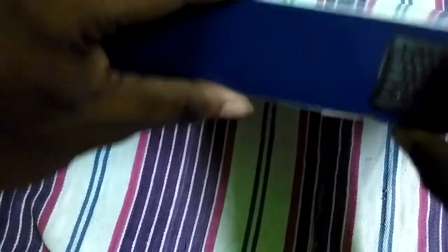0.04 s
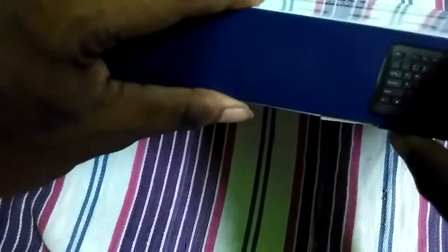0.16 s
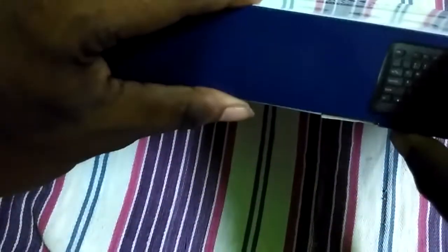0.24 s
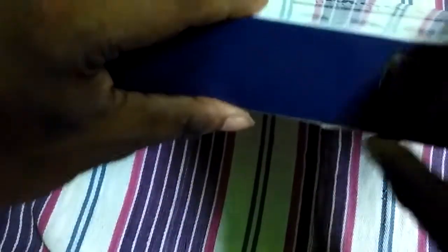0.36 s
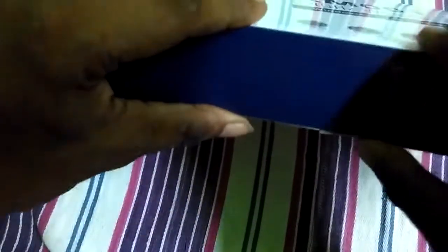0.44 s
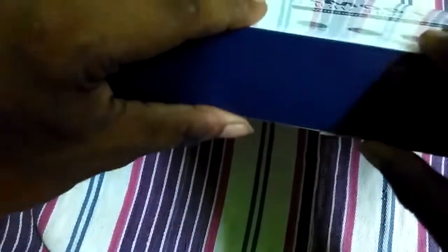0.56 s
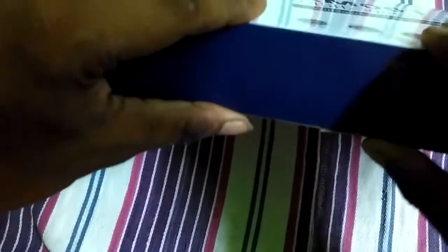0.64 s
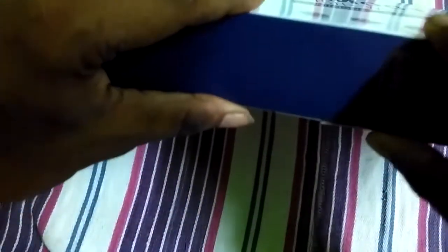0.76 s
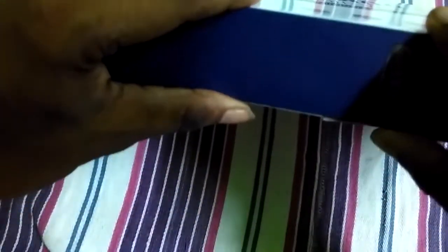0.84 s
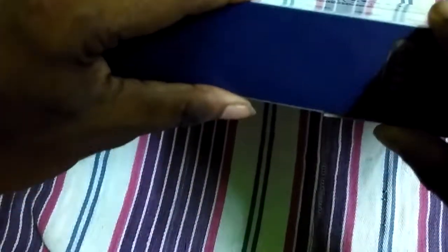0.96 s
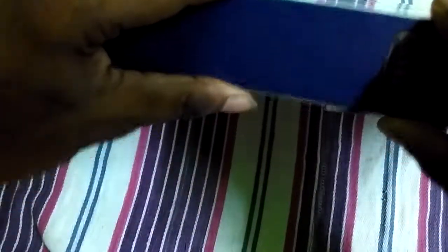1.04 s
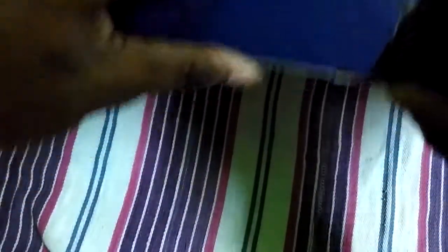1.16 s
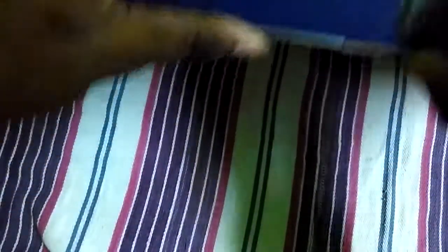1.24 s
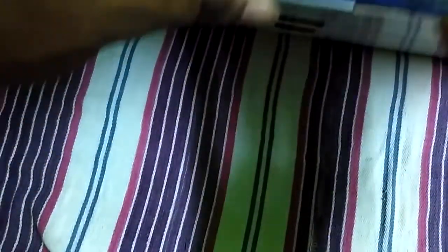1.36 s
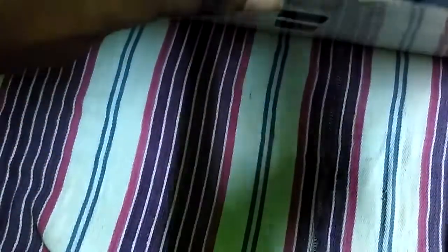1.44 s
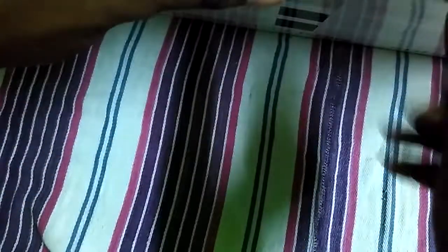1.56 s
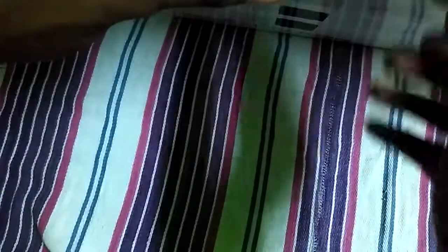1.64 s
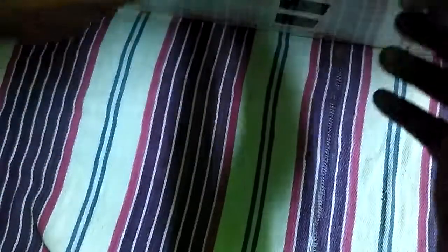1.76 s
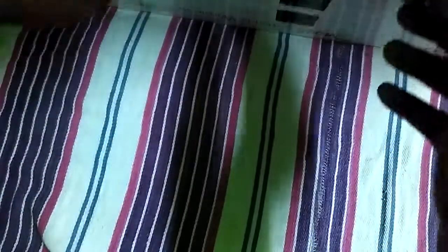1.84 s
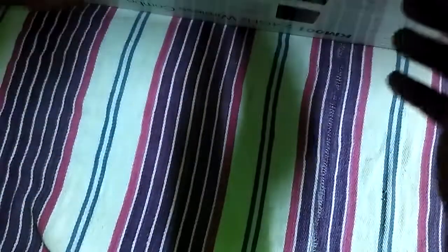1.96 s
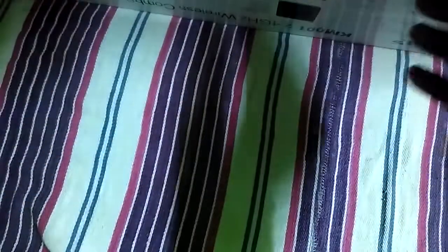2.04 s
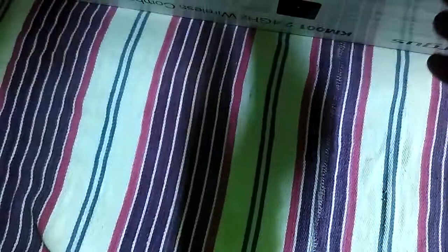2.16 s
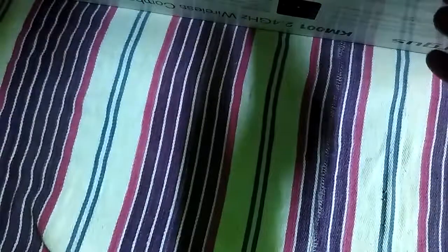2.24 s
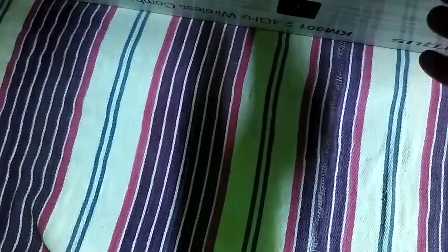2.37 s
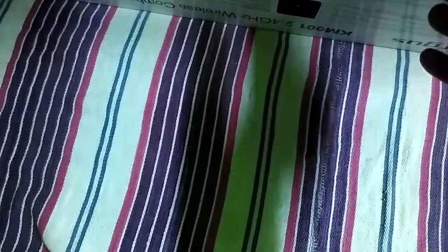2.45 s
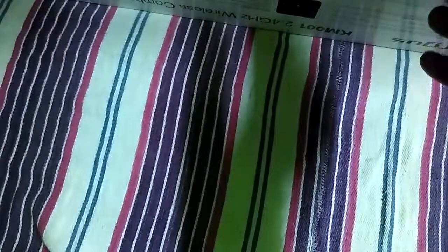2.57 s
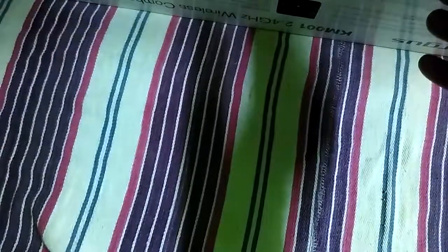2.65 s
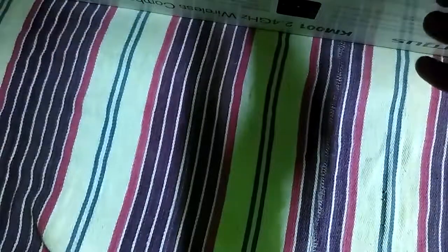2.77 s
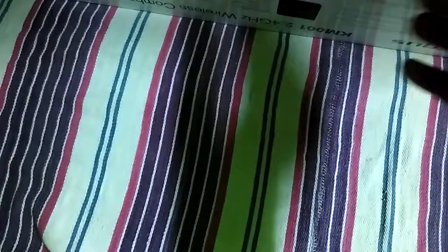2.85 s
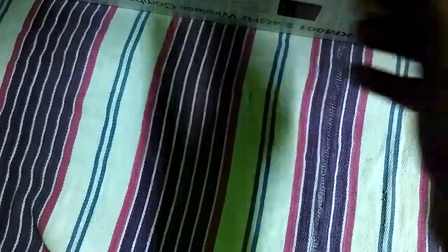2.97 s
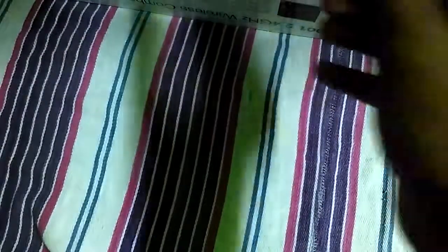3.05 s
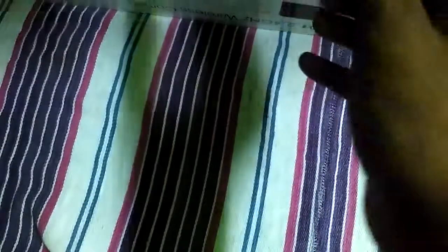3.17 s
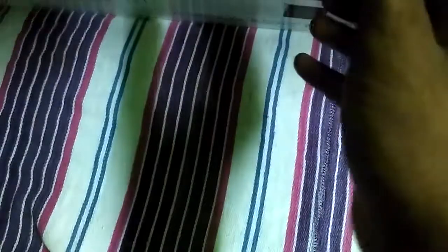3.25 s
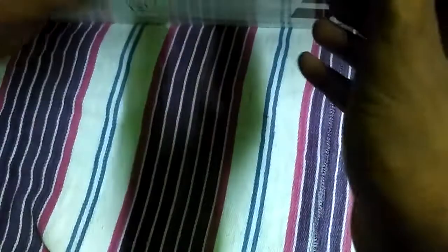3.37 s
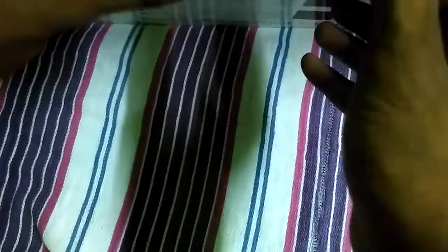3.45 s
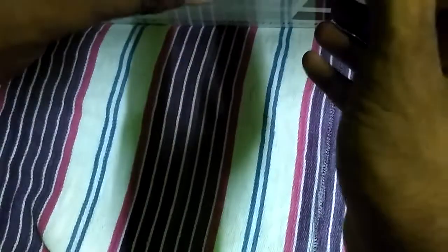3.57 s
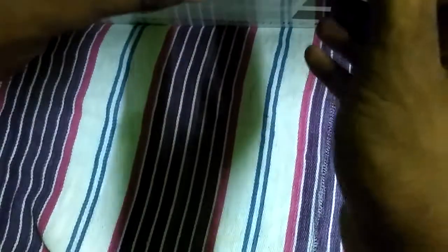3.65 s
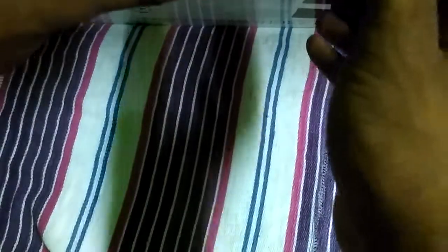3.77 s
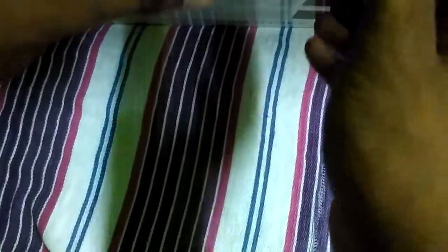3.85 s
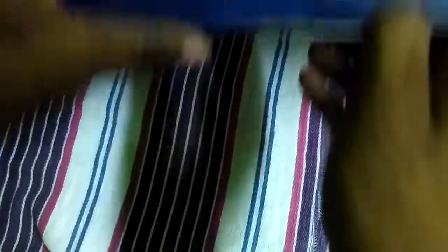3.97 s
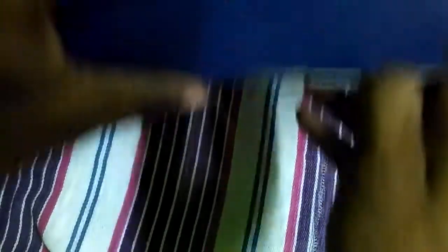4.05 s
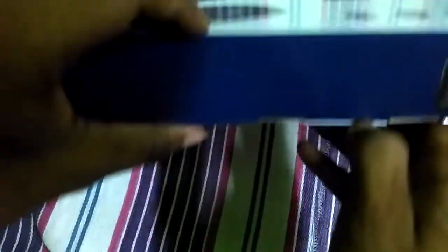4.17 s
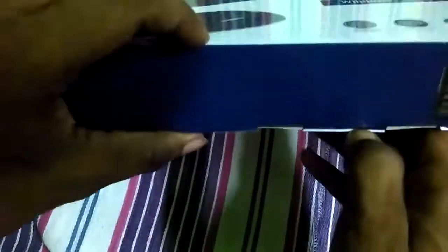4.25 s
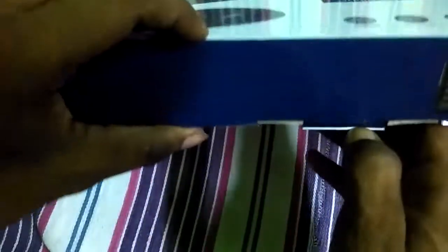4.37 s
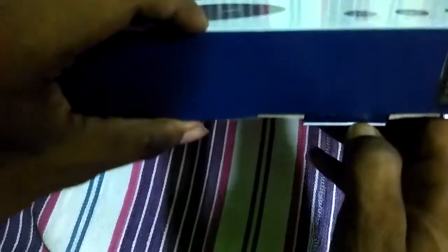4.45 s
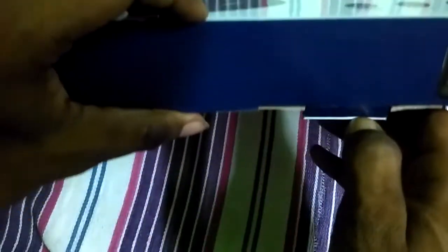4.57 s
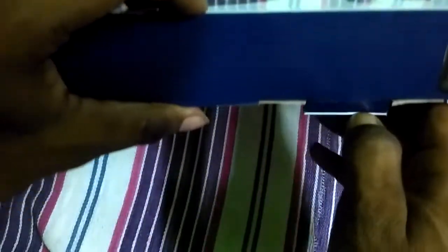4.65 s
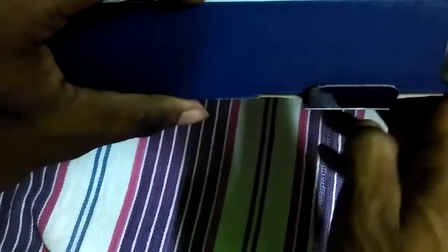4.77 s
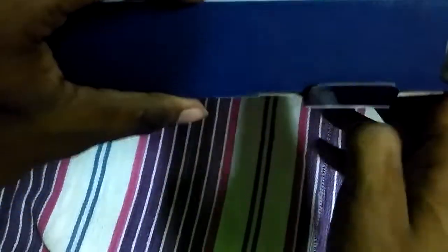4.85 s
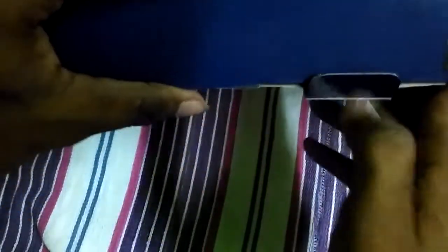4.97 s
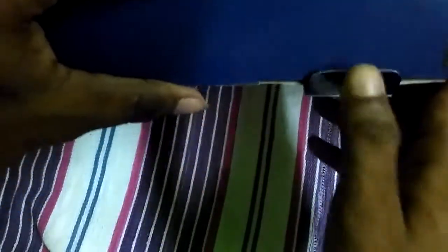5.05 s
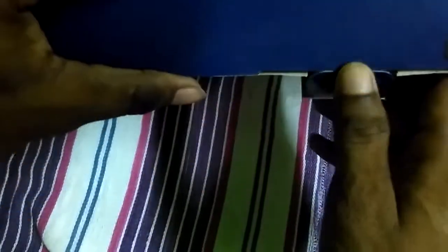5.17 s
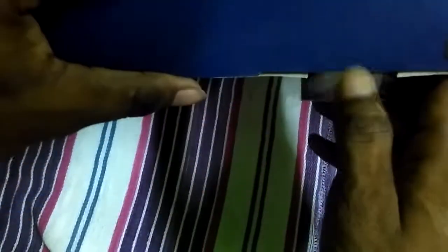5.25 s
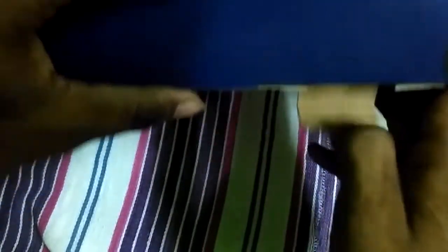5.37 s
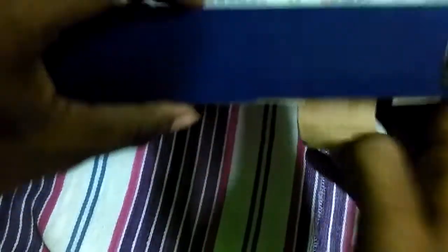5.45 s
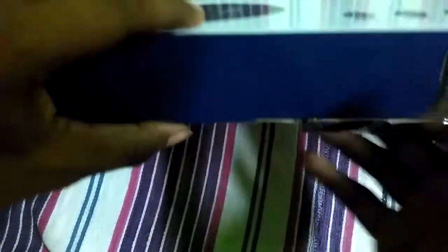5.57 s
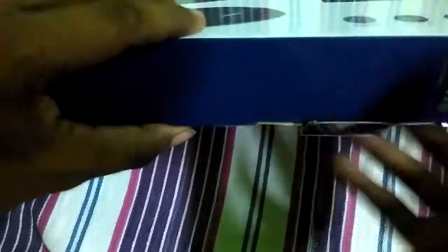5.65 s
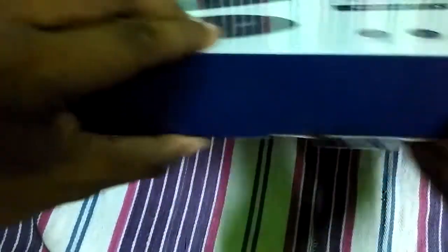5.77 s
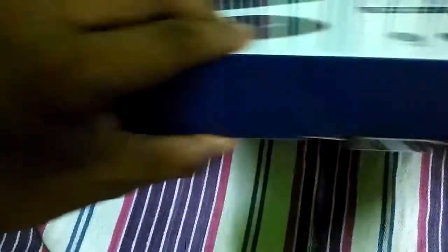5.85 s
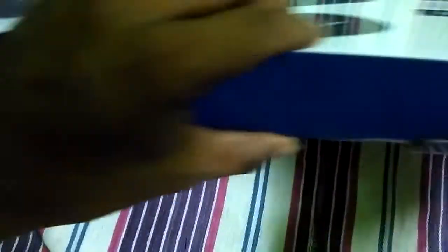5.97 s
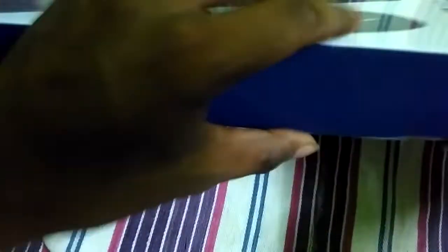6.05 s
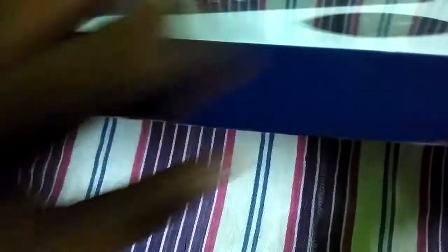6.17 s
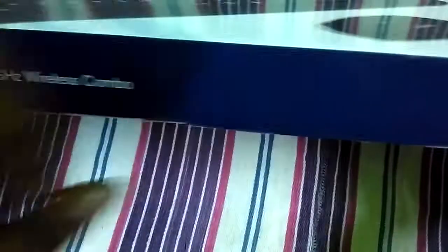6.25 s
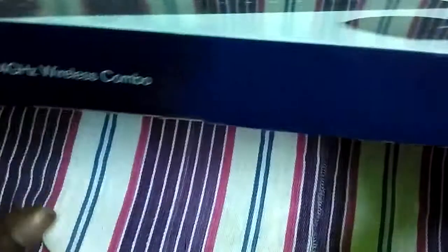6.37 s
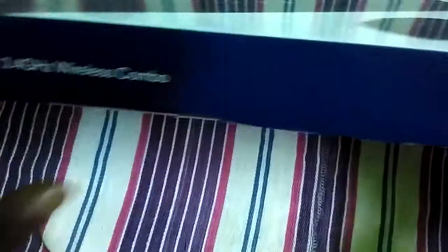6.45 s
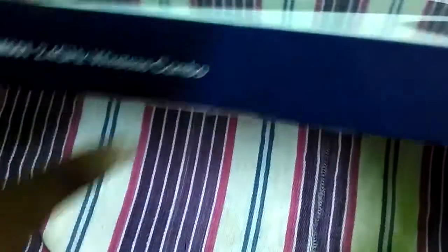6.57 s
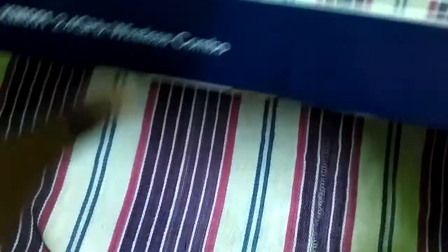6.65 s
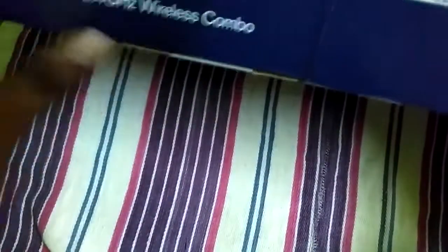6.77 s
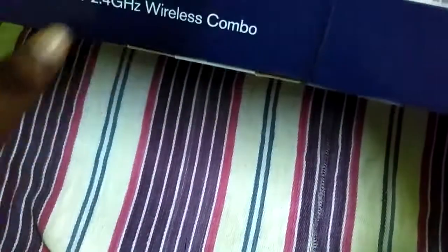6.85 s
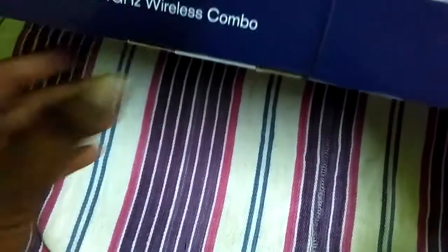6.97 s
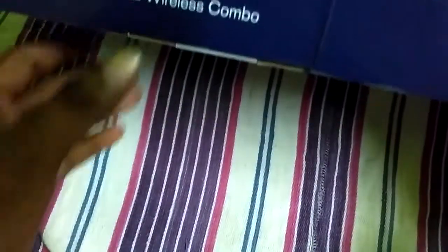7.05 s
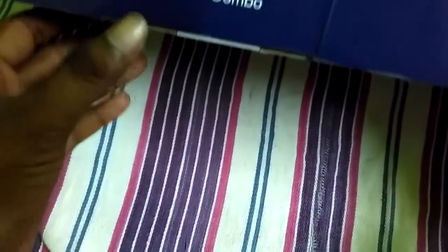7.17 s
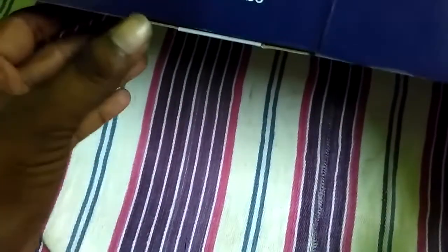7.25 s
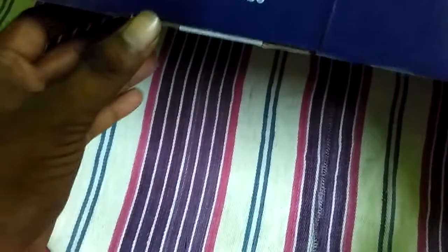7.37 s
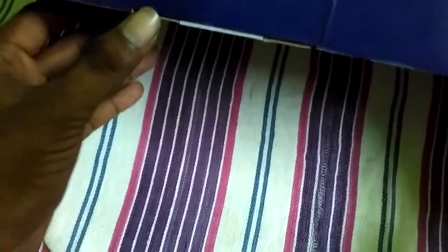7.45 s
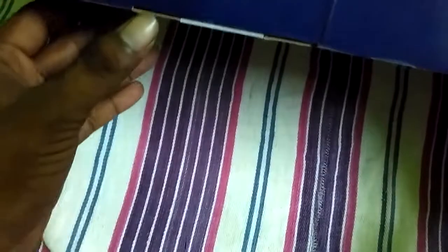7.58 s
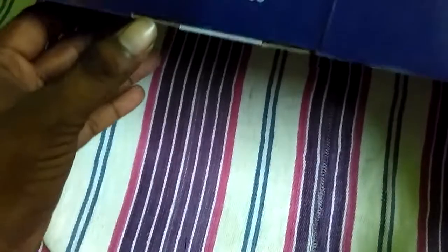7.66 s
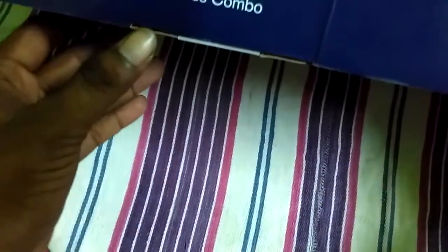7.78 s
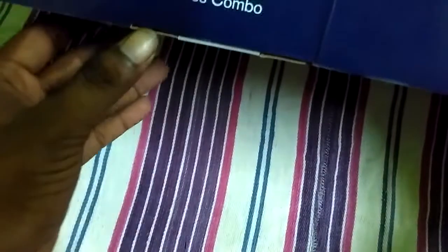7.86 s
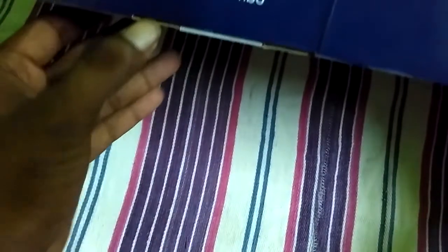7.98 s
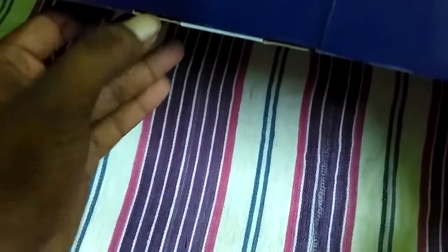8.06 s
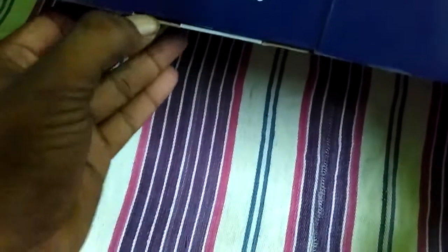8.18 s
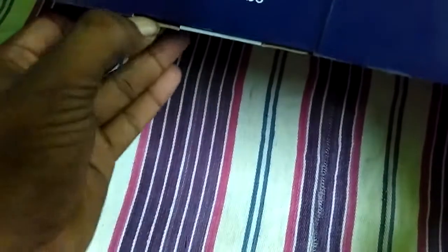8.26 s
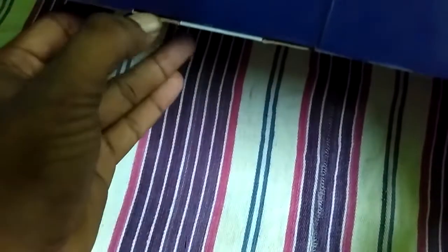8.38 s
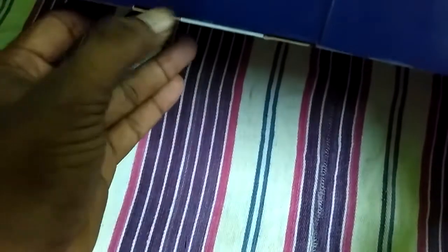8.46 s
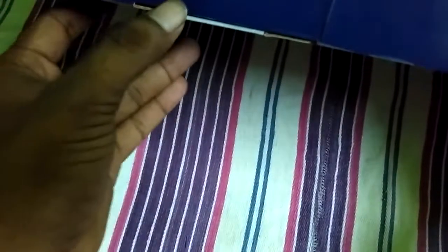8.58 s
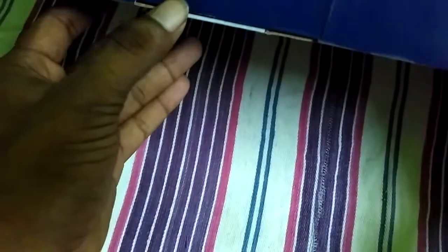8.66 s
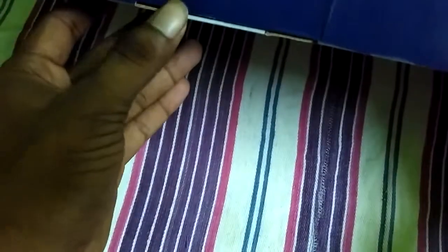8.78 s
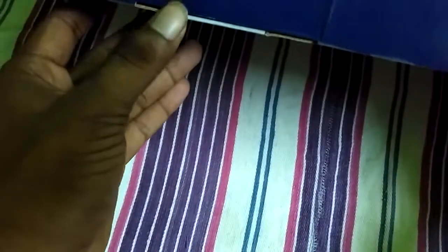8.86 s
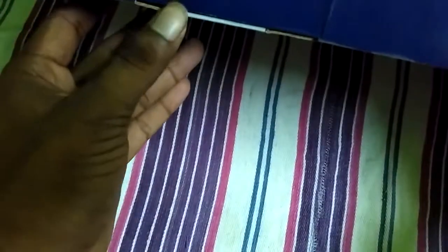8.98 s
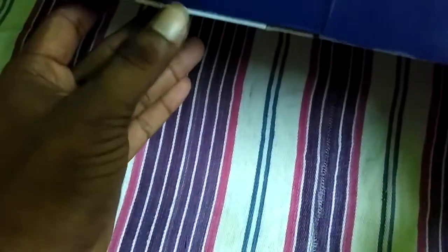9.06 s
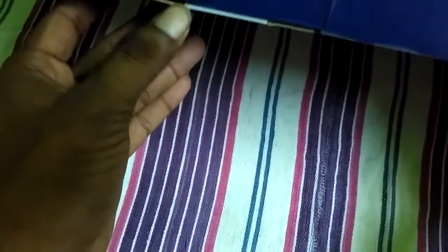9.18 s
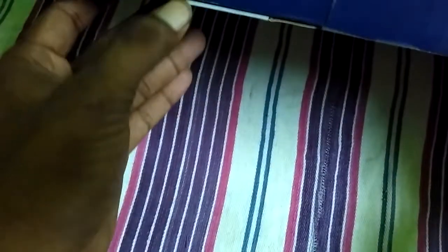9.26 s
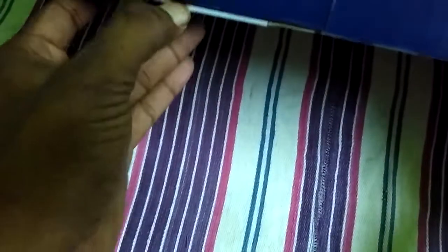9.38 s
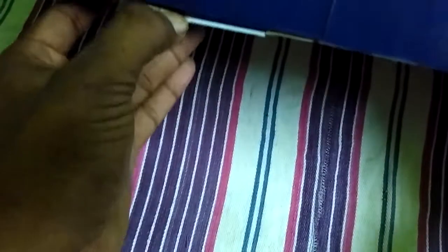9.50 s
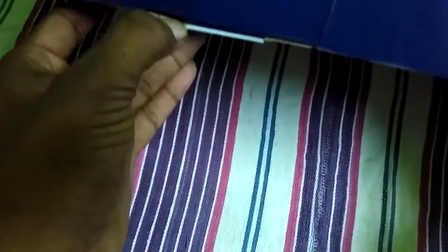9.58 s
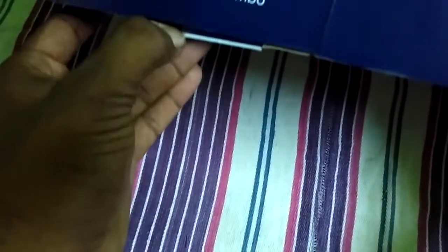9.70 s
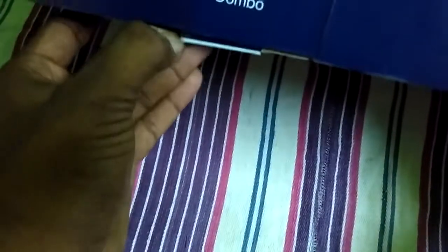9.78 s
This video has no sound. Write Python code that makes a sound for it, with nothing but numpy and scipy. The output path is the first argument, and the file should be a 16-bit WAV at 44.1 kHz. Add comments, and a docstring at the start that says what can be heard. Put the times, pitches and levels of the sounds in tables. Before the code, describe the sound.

Close stereo microphones catch hands working on a hollow cardboard box on a soft bed in a small room. Sparse taps, nail ticks and dry rubs come first, then quick picking at a flap builds to a sharp rip and loud snap midway. Tight card then rubs, creaks and judders, followed by scattered knocks and one heavy knock near the end. A very faint low fan hum runs underneath.

```python
"""A long cardboard box is handled on a cloth-covered bed in a small room, close to the microphones.
A fan hums throughout. At first skin rubs the card, fingers tap it, nails tick and edges scrape briefly.
After 4.4 s a tuck flap is picked at; near 4.85 s it rips out of its slot and snaps free.
From 6 s tight card creaks and judders where it sticks; more taps and rubs follow, one loud near 9.2 s.
Bursts of noise make the rubs and cracks, fading sine waves the knocks, and sine waves the hums."""
import sys
import numpy as np
from scipy import signal
from scipy.fft import rfft, irfft, next_fast_len
from scipy.io import wavfile
from scipy.ndimage import uniform_filter1d

SR = 44100
rng = np.random.default_rng(int(sys.argv[2]) if len(sys.argv) > 2 else 0)


def store_pcm(level_fs):
    """Save levels as 16-bit WAV."""
    pcm = np.round(np.clip(level_fs, -1, 1) * 32767).astype(np.int16)
    wavfile.write(sys.argv[1], SR, np.atleast_2d(pcm).T)


N = 433503
TIME = np.arange(N) / SR   # seconds

# Event levels are set before the box's echoes and the microphones are added.
# skin and card sliding over the box, at full strength from start to end:
# (start t/s, end t/s, hiss level/dB, panel level/dB)
STROKES = [(0.0, 0.09, -70.5, -73.5), (0.414, 0.48, -63.5, -72), (1.263, 1.41, -66, -76),
           (1.8, 2.17, -72, -77), (2.42, 2.633, -66.5, -81.5), (3.288, 3.463, -62, -69),
           (4.01, 4.078, -63.5, -70.5), (5.68, 5.903, -65.5, -68.5), (5.937, 6.06, -57, -66.5),
           (6.053, 6.184, -55, -61.5), (6.25, 6.405, -62.5, -63), (6.566, 6.872, -62, -67.5),
           (8.084, 8.551, -76, -83.5), (9.458, 9.611, -75, -74.5)]
# taps and snaps of the card:
# (t/s, panel pitch f/Hz, hollow thud level/dB, knock level/dB, crack level/dB, tick level/dB)
TAPS = [(0.092, 1080, -70, -56.5, -65, -74), (0.1757, 1810, -71, -37, -37.5, -42.5),
        (0.4057, 800, -57, -50.5, -61.5, -49), (0.5346, 595, -61, -51.5, -70, -70),
        (1.2844, 620, -45.5, -48, -43.5, -39), (1.305, 1120, -54, -51.5, -80, -60),
        (1.496, 745, -47.5, -53, -54, -62), (1.506, 1020.0, -51, -58, -57, -41.5),
        (1.883, 1740, -58, -58, -65, -65), (1.9079, 886, -45, -40.5, -41, -54.5),
        (2.0153, 690.0, -71, -57.5, -80, -54), (2.077, 820, -53, -58.5, -82, -86),
        (2.29, 1120, -55.5, -60, -75, -77), (2.489, 720, -66, -59, -66, -59),
        (2.915, 670, -78, -56, -59, -64), (3.305, 640, -50.5, -58, -63, -72),
        (3.5121, 930, -65, -52.5, -81, -84), (3.7885, 895, -57, -59, -49, -52),
        (3.806, 1100.0, -70, -56, -52, -52), (3.8247, 1010, -55, -53, -53, -49),
        (3.84, 1160, -70, -52, -49.5, -44), (3.9565, 1720.0, -60.5, -61, -57.5, -49.5),
        (4.023, 686, -49, -47, -69, -50), (4.413, 660, -64.0, -58.5, -68, -49.5),
        (4.433, 1900, -52, -56, -58, -48), (4.456, 980, -45, -50, -50, -39.5),
        (4.5374, 637, -49.5, -43, -53.0, -43), (4.591, 720, -43.5, -43, -46.5, -44),
        (4.6738, 746, -42.5, -39, -41.5, -38), (4.693, 700, -50, -38, -41, -37),
        (4.779, 700.0, -44, -40, -48, -33), (4.7985, 1070, -41, -35.5, -44, -31),
        (4.8061, 1300, -54, -42, -43, -36), (4.8337, 905, -33, -30, -49, -37),
        (4.8593, 1013, -40, -21.5, -29.5, -29.5), (5.2703, 1110, -43.5, -36.5, -42, -45),
        (5.384, 1020, -40, -38, -68, -44.5), (5.5666, 686, -50, -53, -53, -50.5),
        (5.597, 646, -56, -55.5, -57, -42), (5.7586, 780, -50, -46.5, -45.5, -37),
        (6.121, 740.0, -48, -51, -54.5, -49), (6.3561, 660.0, -41.5, -47, -53, -51),
        (6.406, 1240, -77, -47.5, -61.5, -73), (6.5243, 680, -44.5, -32, -42.5, -39),
        (6.642, 1280, -73.0, -43, -58, -73), (6.7993, 1060.0, -44.5, -42, -44.5, -56),
        (6.9347, 1507, -65.5, -56, -80.5, -78.5), (7.185, 830, -46, -57, -56, -54.5),
        (7.629, 1100, -58, -60, -62, -63), (7.641, 1013, -53.5, -46, -48, -50.5),
        (8.482, 1970, -64, -56.5, -75.5, -67), (8.6297, 700.0, -51, -46, -55.5, -55.5),
        (8.891, 1025, -77.0, -57.5, -62.5, -56), (9.1762, 660, -34, -38, -42.5, -41.5),
        (9.1907, 840, -30, -22.5, -31, -38), (9.5588, 758, -55.5, -53, -70, -77)]
# card edges dragged over card: (start t/s, end t/s, hiss level/dB, swell over the stroke/dB,
# rasp f/Hz, rasp level/dB, panel level/dB)
SCRAPES = [(0.194, 0.234, -55.5, 2, 1780, -62, -61), (1.483, 1.503, -55.5, 25, 780, -68.5, -64),
           (2.374, 2.416, -63, 7, 1960, -72, -64.5), (4.466, 4.52, -48.5, -2, 4940, -62, -54),
           (4.78, 4.791, -43, -10, 5500, -47, -42.5), (4.812, 4.83, -31, 14, 3480, -44.5, -48),
           (4.829, 4.839, -22, -4, 5460, -29.5, -35), (4.837, 4.854, -44.5, -15, 2803, -48, -46.5),
           (5.186, 5.236, -50, 5.5, 1085, -58.5, -59), (5.238, 5.277, -40.5, 3, 5000, -56, -50),
           (5.373, 5.391, -61, 13, 1380, -54, -54), (5.547, 5.619, -56.5, -5, 1220, -86, -63.5),
           (6.124, 6.215, -52.5, 8.5, 1330, -62, -56.5), (6.669, 6.699, -68, -1, 1300, -60, -61),
           (6.756, 6.779, -57.5, 5, 1730, -59, -57.5), (6.82, 6.902, -56.5, 11, 1300, -67.5, -66.5),
           (7.179, 7.221, -57.5, -1, 1270, -67, -64.5), (9.169, 9.197, -57, 5, 2470, -55, -47.5)]
# fingernails flick over an edge without moving the panel: (t/s, level/dB)
NAIL_TICKS = [(0.315, -49), (1.785, -62), (3.718, -47), (8.0747, -61), (8.507, -56.5), (8.9155, -47.5),
              (9.4324, -56.5)]
# jolts of the whole box on the bed: (t/s, level/dB)
THUMPS = [(1.284, -57), (1.908, -54), (4.833, -39), (4.86, -48.5), (9.19, -35.5)]
# tight card groans as it starts to give: (start t/s, end t/s, slips per s, level/dB)
CREAKS = [(6.022, 6.033, 680, -60.5), (6.172, 6.199, 716, -45.5), (6.759, 6.779, 875, -55)]
# stick-slip runs: (start t/s, length t/s, slips per s, level/dB)
JUDDERS = [(6.2195, .0145, 315, -31), (6.2498, .009, 155, -32), (6.3572, .004, 340, -32),
           (6.3652, .005, 300, -37)]

# ringing tones, with the time each takes to fall by 60 dB: (f/Hz, level/dB, fall t/s)
PANEL_MODES = [(566, -4.5, 0.017), (684, -4, 0.03), (877, -4.5, 0.019), (963, -3, 0.026), (1136, 1, 0.021),
               (1402, -0.5, 0.019), (1680, -6, 0.022), (1893, -3.5, 0.036), (2637, -4.5, 0.018)]   # card panels
HOLLOW_MODES = [(269.5, -3, 0.028), (447, 4, 0.022)]   # air and walls of the hollow box
BOX_MODES = [(62, -11.5, .2), (109, -4, .28), (159, -5.5, 0.48)]   # the whole box
# resonances of the flap: (f/Hz, width f/Hz, level/dB)
FLAP = [(462, 20, 8.5), (931, 130, 5.5), (3480, 300, 6.5)]

# tone colours, as points on a frequency curve: (f/Hz, level/dB)
CRACK = [(900, -19.5), (1700, -6.5), (2400, 0), (3400, -4), (4400, -4.5), (5700, -3.5), (6800, -2.5),
         (9000, -29.5)]   # cracking card
FIBRES = [(2000, -20.5), (4500, -8.5), (6500, -6), (8000, -3), (10500, 2.5), (13000, -7), (15000, -13)]   # fine card fibres
PANEL_CRACKLE = [(300, 0), (1300, -4), (7000, -18.5)]   # crackling panels
RUBBED_PANEL = [(90, -3), (200, -11), (400, 0.5), (640, 1), (1000, -5), (1500, -8.5), (3000, -11.5),
                (6000, -26)]   # panels set moving by rubbing
ROOM_NOISE = [(25, -25), (58, 0), (100, -1.5), (170, -0.5), (210, -7), (270, -12), (430, -13.5),
              (700, -24.5), (1300, -32.5), (14000, -35)]   # rumble of moving air
HISS = [(250, 4.5), (600, 3.5), (1300, -7), (3000, -9), (6000, -12.5), (10000, -6.5), (14000, -10)]   # room hiss with the suppressor open

# echoes of the room: (f/Hz, level/dB, time to fall by 60 dB t/s)
ROOM = [(150, -0.5, 0.026), (510, -7, 0.26), (1110, -14, 0.22), (2980, -8, 0.15), (7000, -19, 0.17),
        (13000, -11.5, 0.17)]
# how alike left and right are: (f/Hz, likeness from 0 to 1)
LIKENESS = [(100, 0.81), (500, 0.76), (1300, 0.27), (3000, 0.23), (6000, 0.35), (10000, 0.038)]
# resonances of the microphone ports: (f/Hz, width f/Hz, left level/dB, right level/dB)
PORTS = [(950, 2600, 4.5, 1), (3173, 4300, -2, 1.5), (9600, 4100, 6, -5), (13600, 650, 3, -6.5)]

CUTOFF_HZ = 14200
FAN_HZ, MAINS_HZ = 127.5, 100   # blade hum and motor hum
CLOSING_DB_PER_S = 59.5   # how fast the noise suppressor closes
STROKE_ATTACK_S, STROKE_RELEASE_S = 0.059, 0.066   # the hand gathers speed, and comes to rest
BRUSH_BELOW_DB, BRUSH_S = 18, 0.0042   # a finger brushes the card just before it lands
GRIP_DETUNE = 0.032   # typical share by which the hands shift the panel tones from blow to blow
FLEX_CYCLES = 6.2   # the struck spot falls by 60 dB in this many cycles
PANEL_RING_DB = -5   # the panel rings on under it
CONTACT_LAG_S = .00009   # a contact reaches one microphone before the other
RASP_Q = 4.2   # how narrowly each of two filters makes the dragged edge sing
CATCH_DB, CATCHES_PER_S = 1, 550   # the pull comes in uneven jerks
NAIL_CRACK_DB = -7   # the edge's crack against the nail's tick
BOOM_DB, BOOM_T60_S, BOOM_BAND_HZ = -6.5, .24, (140, 290)   # crowded low tones of the jolted walls
CREAK_WAVER, CREAK_SWELL_DB = 0.038, 13   # wavering share of the slip rate; growth until the card lets go
SLIP_LAG_S = 0.0002   # the slips reach the right microphone later


def from_db(db):
    """Turn decibels into a multiplier."""
    return 10 ** (np.asarray(db) / 20)


def rms_one(x):
    """Scale to an average strength (rms) of 1."""
    return x / np.sqrt(np.mean(x ** 2) + 1e-20)


def at_level(hit, db, size=265):
    """Scale a sound so that its first samples (usually 6 ms) have this rms level."""
    return hit * from_db(db) / np.sqrt(np.mean(hit[:, :size] ** 2))


def at_hz(points, hz, axis=1):
    """Read a table column between its points, with frequency on a log scale."""
    points = np.array(points)
    return np.interp(np.log(hz + 1e-9), np.log(points[:, 0]), points[:, axis])


def add(track, s, sound):
    """Mix a sound into a track at a time in seconds."""
    i = max(round(s * SR), 0)
    track[..., i:i + sound.shape[-1]] += sound[..., :max(N - i, 0)]


def drift(rate):
    """A random wander of rms 1: straight lines between 'rate' random points a second."""
    knots = rng.standard_normal(int(N / SR * rate) + 2)
    return rms_one(np.interp(TIME * rate, np.arange(len(knots)), knots))


def coloured(pair, spectrum):
    """Two unrelated signals become one stereo sound of rms 1, alike in the bass and apart in the treble."""
    length = pair.shape[1]
    size = next_fast_len(length, True)
    hz = np.arange(size // 2 + 1) * SR / size
    mid, side = rfft(pair, size) * from_db(at_hz(spectrum, hz))
    alike = np.clip(at_hz(LIKENESS, hz), 0, 1)
    stereo = np.sqrt(1 + alike) * mid + np.sqrt(1 - alike) * side * [[1], [-1]]
    return rms_one(irfft(stereo, size)[:, :length])


def grains(per_s, spread_db):
    """Fibres catch and let go at random, most of them weakly."""
    sizes = from_db(spread_db * np.minimum(rng.exponential(1, N), 3))
    return rng.choice([-1, 1], (2, N)) * sizes * (rng.random(N) < per_s / SR)


def resonate(x, hz, width_hz, db):
    """Lift or lower one band, as a resonance does."""
    b, a = signal.iirpeak(hz, hz / width_hz, fs=SR)
    return x + (from_db(db) - 1) * signal.lfilter(b, a, x)


def wander(x, spread_db, rate):
    """As the contact travels, the card's resonances flare and fade, each by its own random wander."""
    out = np.zeros((2, N))
    for hz in np.geomspace(350, 6500, 12):
        b, a = signal.iirpeak(hz, 5, fs=SR)
        flare = from_db(spread_db * np.minimum(drift(rate), 2))
        out += signal.lfilter(b, a, x) * flare
    return rms_one(out)


def ringing(modes, lag_s, size=4096):
    """Fading sine tones, heard a little earlier at one microphone than at the other."""
    lags = np.maximum([[-lag_s], [lag_s]], 0)
    t = np.maximum(TIME[:size] - lags, 0)
    return sum(gain * np.sin(2 * np.pi * hz * t) * from_db(-60 * t / t60) for hz, gain, t60 in modes)


def knock(pitch_hz, octaves, lag_s):
    """The struck spot flexes at its own pitch and wakes nearby panel tones, slightly detuned by the grip."""
    hz, db, t60 = np.transpose(PANEL_MODES)
    hz = hz * (1 + GRIP_DETUNE * rng.standard_normal(len(hz)))
    distance = np.log2(hz / pitch_hz) / octaves
    strength = from_db(db + PANEL_RING_DB) / (1 + distance ** 2)
    panel = zip(hz, strength * rng.choice([-1, 1], len(hz)), t60)
    return ringing([(pitch_hz, 1, FLEX_CYCLES / pitch_hz), *panel], lag_s)


def burst(spectrum, fade_s, ring_db, ring_s, size=2048):
    """A fracture spreads quickly through the fibres, and the card shivers briefly after it."""
    t = np.maximum(np.arange(size) - 32, 0) / SR
    spreading = 1 - np.exp(-t / .0006)
    shape = spreading * (np.exp(-t / fade_s) + from_db(ring_db) * np.exp(-t / ring_s))
    return coloured(rng.standard_normal((2, size)) * shape, spectrum)


def fan(hum_db, mains_db, air_db, lead=0.9):
    """Blade and motor hums waver over the rumble of air; the blades' phase differs between microphones."""
    out = from_db(air_db + drift(10)) * coloured(rng.standard_normal((2, N)), ROOM_NOISE)
    for hz, db, ahead in ((FAN_HZ, hum_db, lead), (MAINS_HZ, mains_db, 0)):
        phase = 2 * np.pi * hz * TIME + .8 * drift(5)
        strength = 1 + .5 * drift(6)
        hum = strength * np.sin(phase + ahead * np.array([[0], [1]]))
        out += from_db(db) * rms_one(hum)
    return out


def rubbing(uneven_db):
    """Strokes swell, hold and die away: a fine hiss, while coarser catches rustle and crackle in the box."""
    hiss, panel = np.zeros((2, N))
    for start, end, hiss_db, panel_db in STROKES:
        edges = np.minimum((TIME - start) / STROKE_ATTACK_S, (end - TIME) / STROKE_RELEASE_S)
        speed = np.exp(np.clip(edges, -20, 0))
        hiss = np.maximum(hiss, from_db(hiss_db) * speed)
        panel = np.maximum(panel, from_db(panel_db) * speed)
    grip_db = uneven_db * drift(45)
    sliding = from_db(0.63 * grip_db) * coloured(grains(per_s=16000, spread_db=2.5), FIBRES)
    catches = coloured(grains(per_s=650, spread_db=3.5), RUBBED_PANEL)
    rustle = wander(catches, spread_db=3.0, rate=50)
    crackle = from_db(-3) * coloured(grains(per_s=110, spread_db=4), PANEL_CRACKLE)
    return hiss * sliding + panel * (from_db(grip_db) * rustle + crackle)


def suppressed_hiss(sound, hiss_db, open_db, slope):
    """A noise suppressor opens with the box's sounds and closes slowly, so room hiss trails them."""
    power = signal.lfilter([.004], [1, -.996], sound[0] ** 2)
    level_db = 10 * np.log10(power + 1e-12)
    closing = CLOSING_DB_PER_S * TIME
    # a running maximum along a falling slope: jump up at once, come down steadily
    opening_db = np.maximum.accumulate(slope * np.minimum(level_db - open_db, 0) + closing) - closing
    return from_db(hiss_db + opening_db) * coloured(rng.standard_normal((2, N)), HISS)


def room(x, size=20000):
    """Diffuse echoes from near walls, each band fading at its own rate; the left channel feeds them."""
    t, echo = TIME[:size], np.zeros((2, size))
    hz = np.arange(size // 2 + 1) * SR / size
    noise = rfft(coloured(rng.standard_normal((2, size)), [(100, 0), (10000, 0)]))
    for centre in 125 * 2 ** np.arange(8):   # octave bands
        weight = np.clip(1 - np.abs(np.log2((hz + 1) / centre)), 0, 1)
        band = irfft(noise * weight, size)
        onset = np.clip(t / .004 - 1, 0, 1)   # echoes come in from 4 to 8 ms
        fade = from_db(-60 * t / at_hz(ROOM, centre, axis=2)) * onset
        echo += band * fade / np.linalg.norm(fade) * from_db(at_hz(ROOM, centre))
    return signal.fftconvolve(x[:1], echo, axes=1)[:, :N]


def brushes():
    """Each tap is led in by a short brush of the finger that swells up to the contact."""
    force, lead = np.zeros((2, N)), TIME[:SR // 25]
    swell = np.exp(-lead[::-1] / BRUSH_S)
    for s, _, _, knock_db, _, tick_db in TAPS:
        levels_db = np.array([[knock_db], [tick_db]]) - BRUSH_BELOW_DB
        add(force, s - lead[-1], from_db(levels_db) * swell)
    panel_force, fibre_force = force
    catches = grains(per_s=6000, spread_db=3.0)
    return panel_force * coloured(catches, RUBBED_PANEL) + fibre_force * coloured(catches, FIBRES)


def taps():
    """Each contact ticks on the surface, cracks the crease, knocks the panel and thuds in the hollow box."""
    out = np.zeros((2, N))
    for s, pitch_hz, thud_db, knock_db, crack_db, tick_db in TAPS:
        lag_s = CONTACT_LAG_S * rng.choice([-1, 1])
        panel = at_level(knock(pitch_hz, octaves=0.75, lag_s=lag_s), knock_db)
        # the bare dB values serve as gains here; at_level then sets the thud's loudness
        thud = at_level(ringing(HOLLOW_MODES, lag_s), thud_db)
        add(out, s, panel - thud)
        crack = burst(CRACK, fade_s=.0009, ring_db=-14, ring_s=.005)
        tick = burst(FIBRES, fade_s=0.00066, ring_db=-15.5, ring_s=0.0048)
        add(out, s - .0006, at_level(crack, crack_db) + at_level(tick, tick_db))
    return out


def scrapes():
    """A cut edge grates across the card in short, jerky strokes, each rasping at a pitch of its own."""
    force, rasp = np.zeros((2, N)), np.zeros((2, N))
    catches = grains(per_s=9000, spread_db=2.5)
    grit = coloured(catches, CRACK)
    for start, end, hiss_db, swell_db, rasp_hz, rasp_db, panel_db in SCRAPES:
        size = max(round((end - start) * SR), 2)
        swell = from_db(swell_db * np.linspace(-.5, .5, size))
        add(force, start, from_db([[hiss_db], [panel_db]]) * swell)
        b, a = signal.iirpeak(rasp_hz, max(RASP_Q, 1), fs=SR)
        stroke = grit[:, round(start * SR):][:, :size] * swell
        stroke = np.pad(stroke, [(0, 0), (0, SR // 100)])   # 10 ms for the ringing to fade
        sung = signal.lfilter(b, a, signal.lfilter(b, a, stroke))
        add(rasp, start, at_level(sung, rasp_db, size=size))
    hiss, panel = uniform_filter1d(force, size=150, axis=1)   # soften the stroke ends
    jerks = rms_one(from_db(CATCH_DB * np.minimum(drift(CATCHES_PER_S), 2)))
    body = wander(coloured(catches, RUBBED_PANEL), spread_db=4, rate=70)
    return jerks * (hiss * coloured(catches, FIBRES) + panel * body + rasp)


def nail_ticks():
    """A nail flicks over an edge: a dry tick with a little crack of the edge in it."""
    out = np.zeros((2, N))
    for s, db in NAIL_TICKS:
        for spectrum, part_db in ((FIBRES, db), (CRACK, db + NAIL_CRACK_DB)):
            part = burst(spectrum, fade_s=.0008, ring_db=-17, ring_s=.004)
            add(out, s - .0006, at_level(part, part_db))
    return out


def thumps():
    """After a jolt the whole box wobbles briefly and its walls give a broad, dull boom."""
    out, t = np.zeros((2, N)), TIME[:SR // 2]
    wobble = sum(from_db(db - 60 * t / t60) * np.sin(2 * np.pi * hz * t) for hz, db, t60 in BOX_MODES)
    wobble = wobble / np.abs(wobble).max()
    dull = signal.butter(2, BOOM_BAND_HZ, "band", fs=SR, output="sos")
    for s, db in THUMPS:
        noise = coloured(rng.standard_normal((2, len(t))), RUBBED_PANEL)
        walls = rms_one(signal.sosfilt(dull, noise))
        boom = walls * from_db(BOOM_DB - 60 * t / BOOM_T60_S)
        add(out, s, from_db(db) * (wobble + boom))
    return out


def creaks(second_db):
    """Slips follow so fast that they fuse into a short, wavering groan of two tones an octave apart."""
    out, waver = np.zeros((2, N)), 1 + CREAK_WAVER * drift(250)
    for start, end, per_s, db in CREAKS:
        i, size = round(start * SR), max(round((end - start) * SR), 2)
        elapsed = np.cumsum(waver[i:i + size]) / SR
        phase = 2 * np.pi * per_s * (elapsed - np.array([[0], [SLIP_LAG_S]]))
        groan = np.sin(phase) + from_db(second_db) * np.sin(2 * phase)
        swell = from_db(CREAK_SWELL_DB * np.linspace(-1, 0, size)) * signal.windows.tukey(size)
        add(out, start, at_level(swell * groan, db, size=size))
    return out


def judders(pulse_hz, fade_s, panel_db, soft_hz):
    """Tight card sticks and slips: a short run of dull, alike pulses."""
    out, t = np.zeros((2, N)), TIME[:4096] - [[0], [SLIP_LAG_S]]
    ring = at_level(knock(650, octaves=0.8, lag_s=SLIP_LAG_S), panel_db)
    pulse = 2 * (t >= 0) * np.cos(2 * np.pi * pulse_hz * t) * np.exp(-np.abs(t) / fade_s)
    soften = signal.butter(6, soft_hz, fs=SR, output="sos")
    slip = signal.sosfilt(soften, pulse + ring)
    for start, length, per_s, db in JUDDERS:
        for s in np.arange(start, start + length, 1 / per_s):
            # each slip is slightly off in time and level
            add(out, s + rng.normal(0, 0.00036), from_db(db + rng.normal(0, 1)) * slip)
    return out


def scene():
    """The box in its room; the judder is so close that it hardly stirs an echo."""
    grating = scrapes()
    for hz, width_hz, db in FLAP:
        grating = resonate(grating, hz, width_hz, db)
    box = rubbing(uneven_db=3.0) + brushes() + taps() + grating
    box = box + nail_ticks() + thumps() + creaks(second_db=-3)
    judder = judders(pulse_hz=1600, fade_s=.00022, panel_db=-17, soft_hz=3100)
    background = fan(hum_db=-69, mains_db=-71, air_db=-62)
    background = background + suppressed_hiss(box, hiss_db=-59.0, open_db=-39.0, slope=0.5)
    return box + judder + room(box + from_db(-13) * judder) + background


def record(dry):
    """Each microphone port adds its resonances, the right one has reversed polarity, and the top is cut."""
    out = dry
    for hz, width_hz, left_db, right_db in PORTS:
        out = resonate(out, hz, width_hz, [[left_db], [right_db]])
    top_cut = signal.ellip(12, .1, 80, CUTOFF_HZ, fs=SR, output="sos")
    return signal.sosfilt(top_cut, out * [[1], [-1]])


dry = scene()
out = record(dry)
store_pcm(out)
```